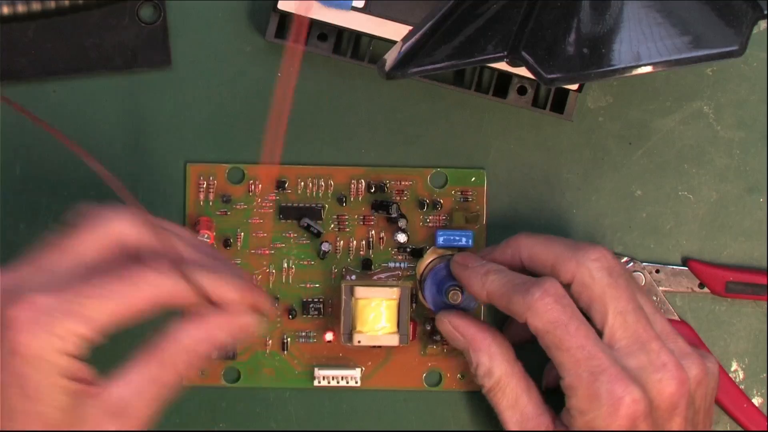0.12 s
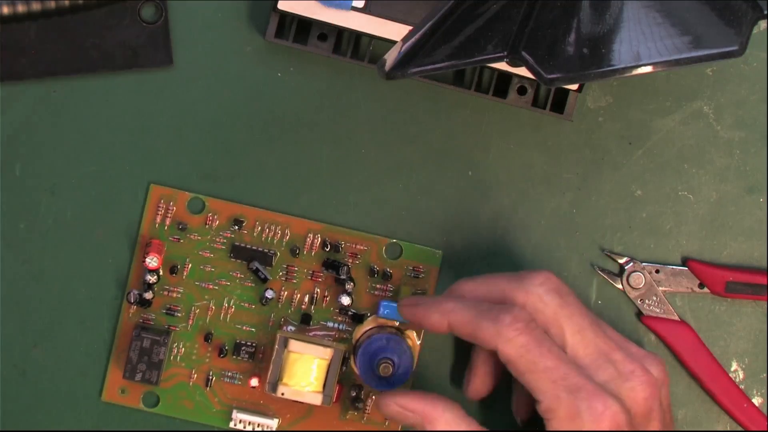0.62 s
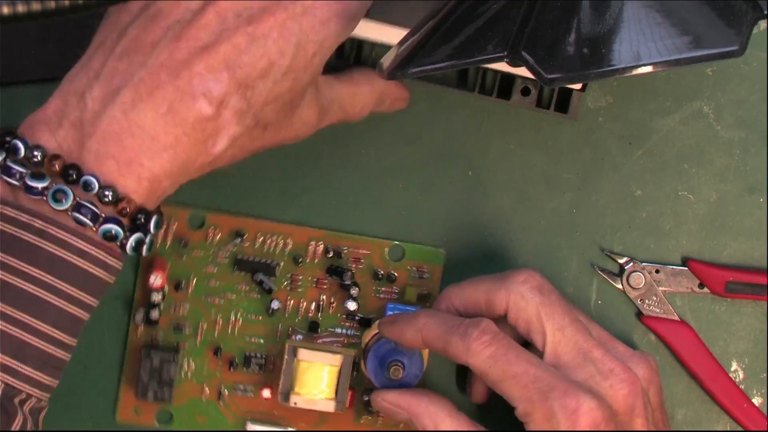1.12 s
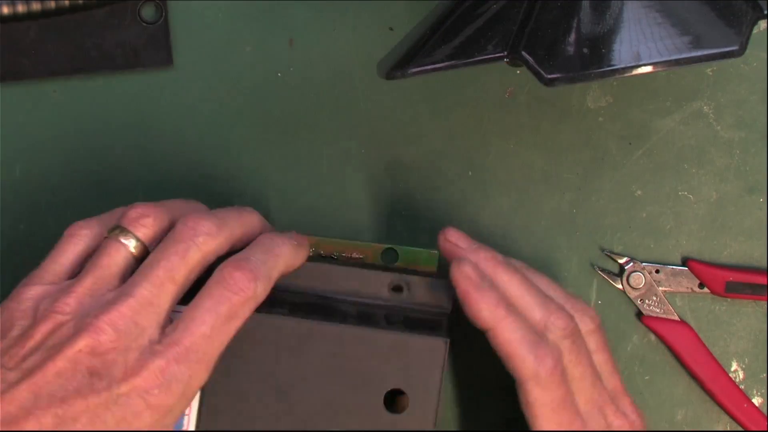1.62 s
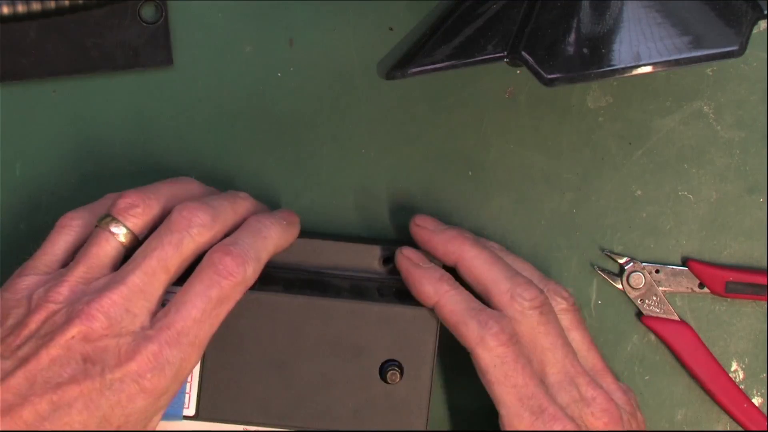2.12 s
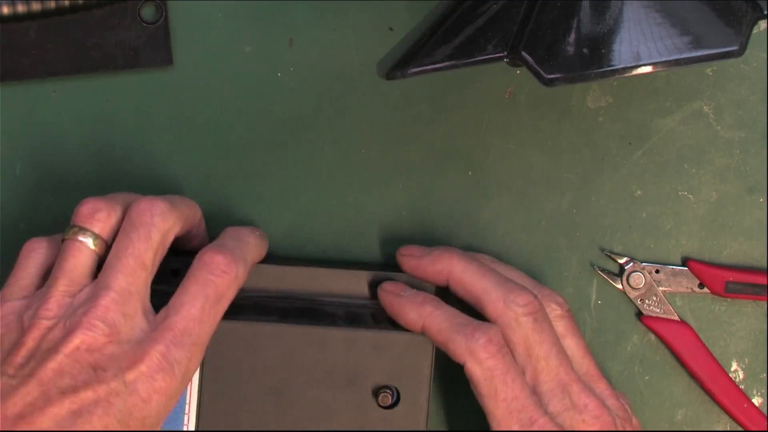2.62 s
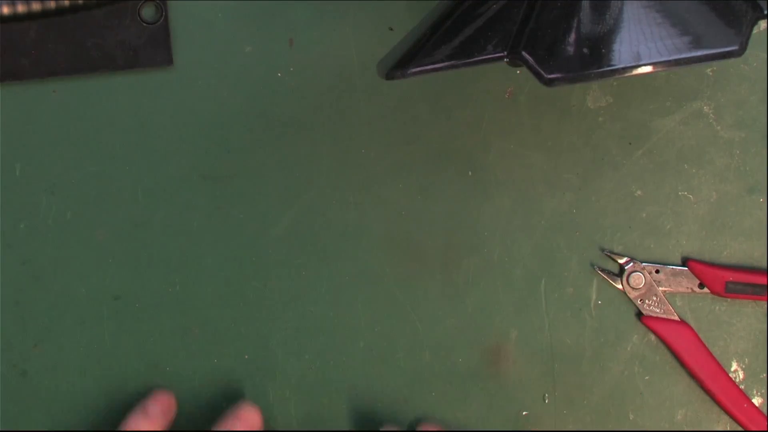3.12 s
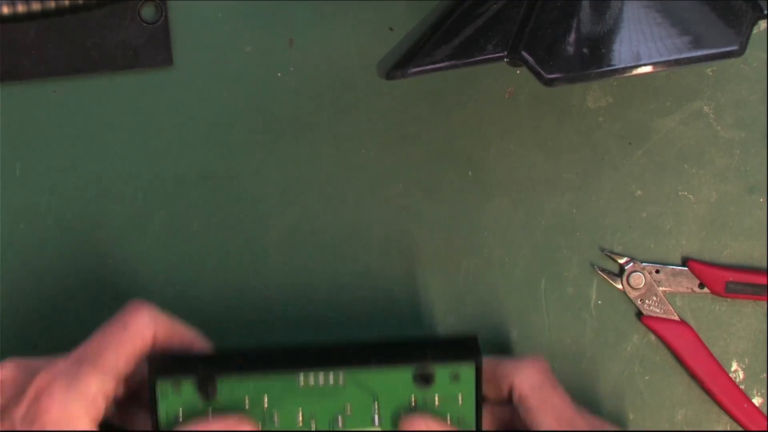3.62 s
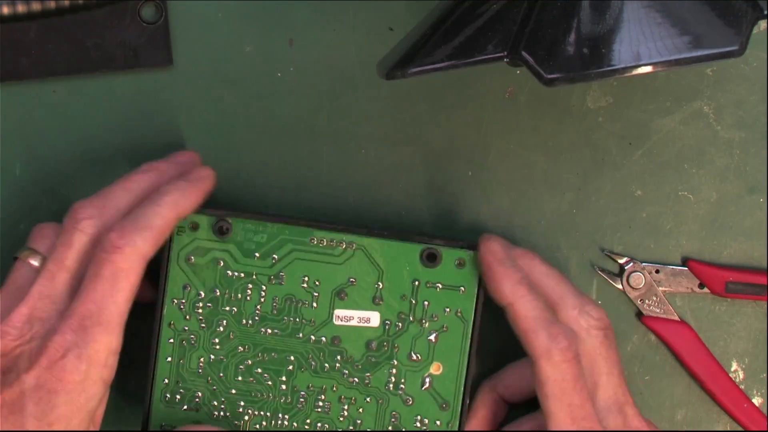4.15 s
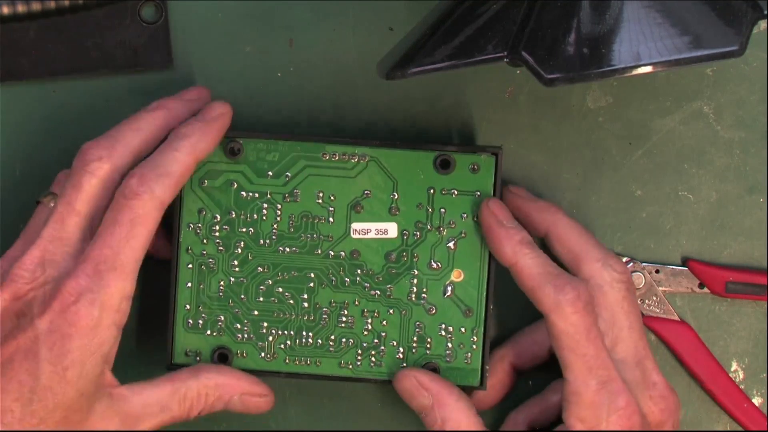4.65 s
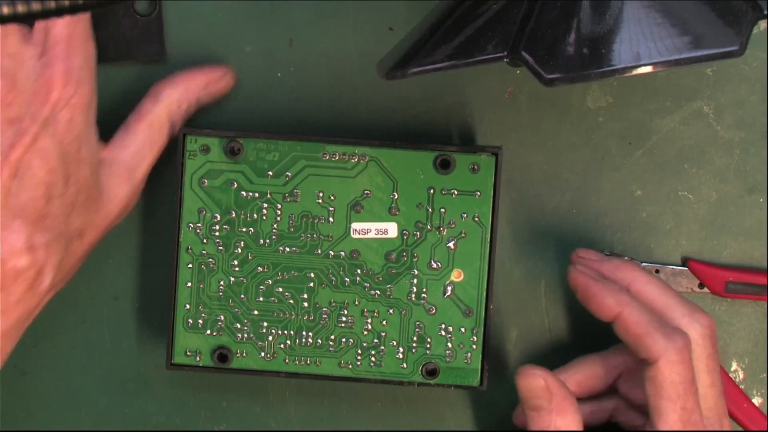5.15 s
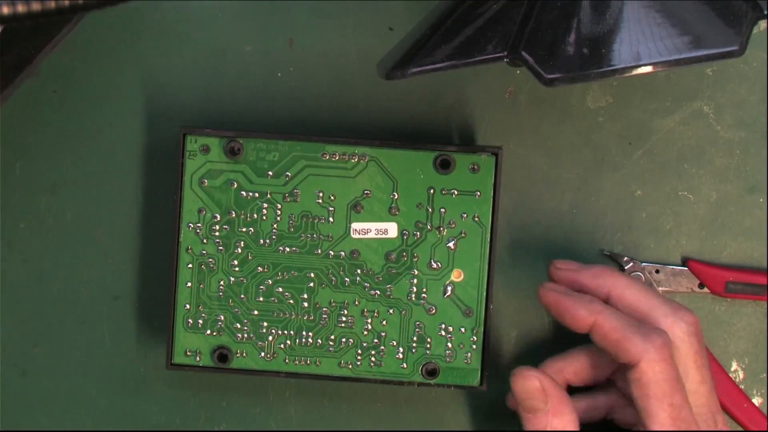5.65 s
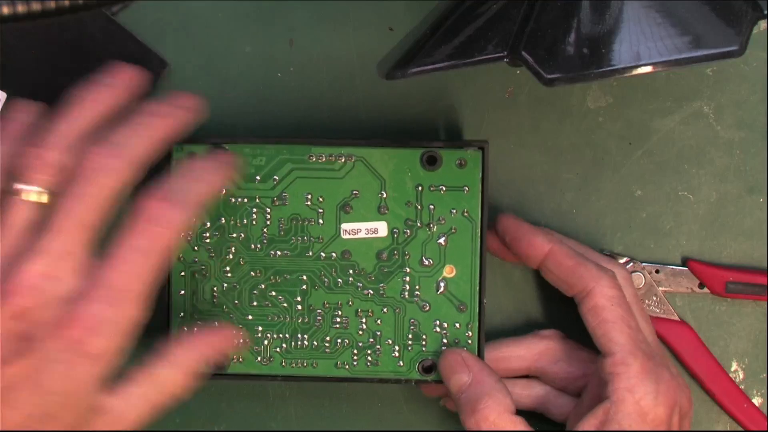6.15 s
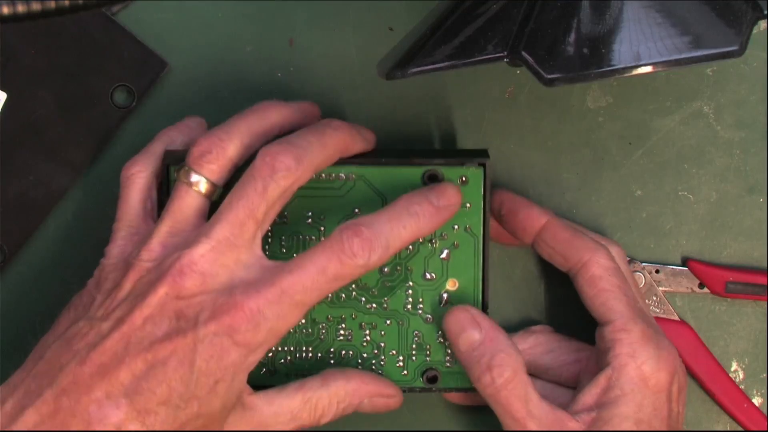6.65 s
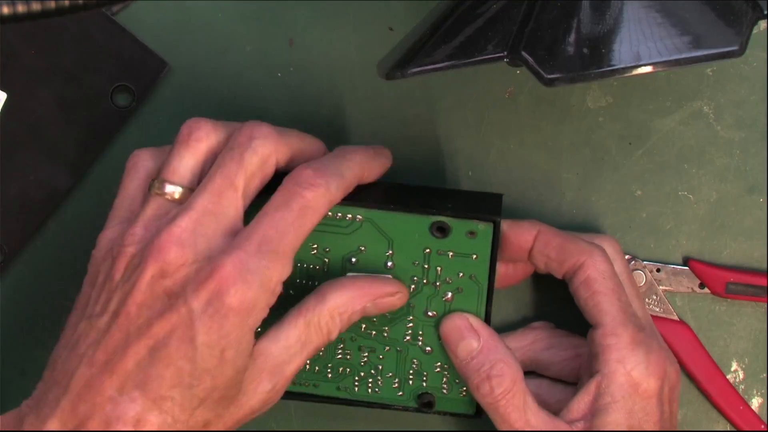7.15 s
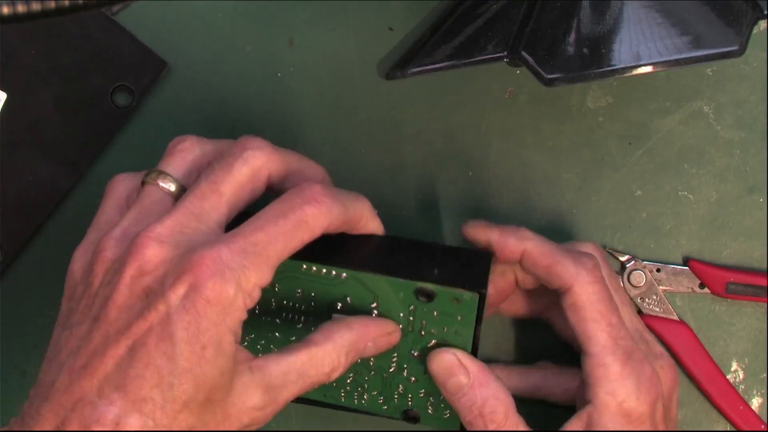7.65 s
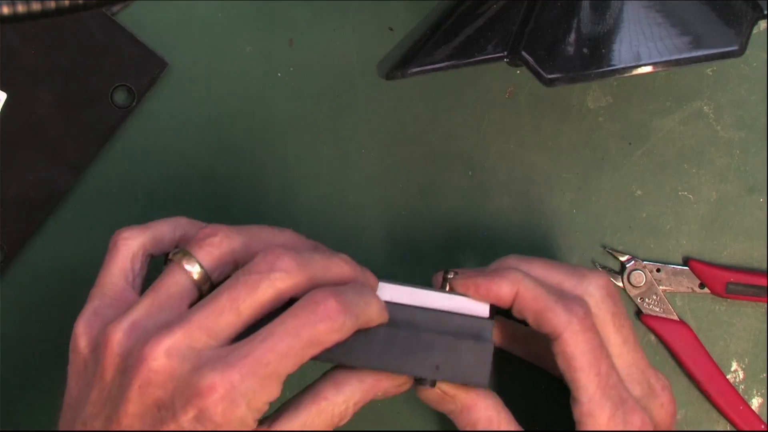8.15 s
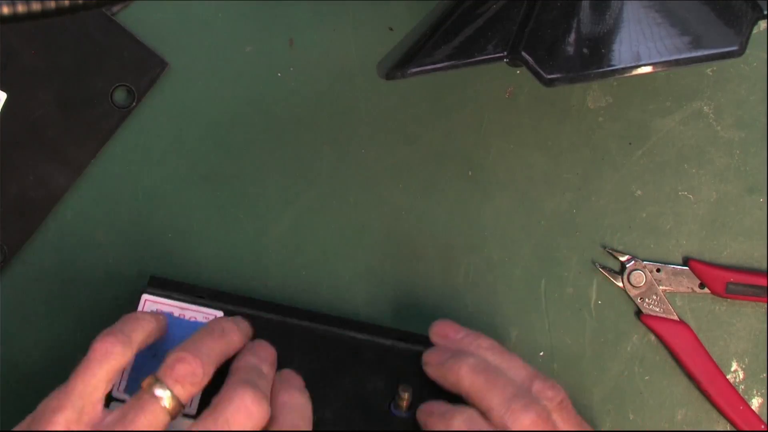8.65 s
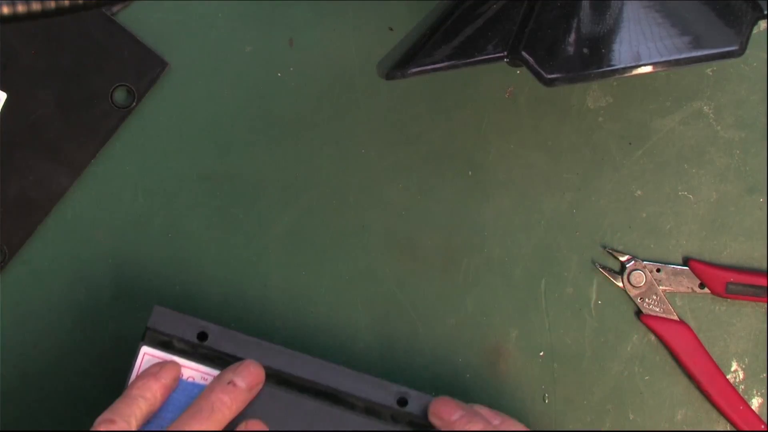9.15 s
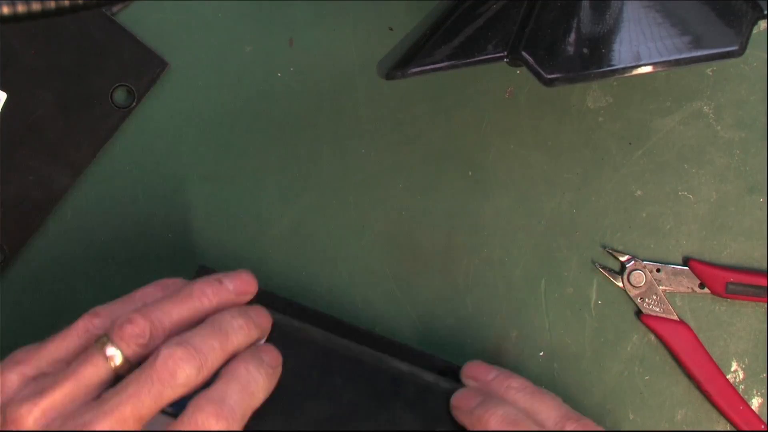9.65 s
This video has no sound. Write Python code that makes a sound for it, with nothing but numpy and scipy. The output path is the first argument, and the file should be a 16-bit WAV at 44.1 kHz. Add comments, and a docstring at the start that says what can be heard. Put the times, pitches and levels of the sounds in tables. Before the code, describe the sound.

A circuit board ticks lightly on a workbench, then a hollow plastic housing knocks, scrapes and clacks, with the hardest cracks near the end.

```python
"""Hands at a quiet workbench drag and tick a circuit board, as short decaying rings and gritty rubs.
A hollow plastic housing then knocks and scrapes, booming near 800 Hz with hard edges that crack; a plastic
lid taps briefly, and the housing returns with its hardest knocks near the end. Heavy knocks shake the bench.
Filtered noise gives rumble and hiss and sparse random taps a short room tail; the hardest knocks overload."""
import sys
import numpy as np
from scipy import signal
from scipy.fft import rfft, irfft
from scipy.io import wavfile
from scipy.ndimage import uniform_filter1d

SR = 44100
rng = np.random.default_rng(int(sys.argv[2]) if len(sys.argv) > 2 else 0)


def master_out(mix):
    """Clip the mix to full scale and print it as 16-bit PCM to the path in sys.argv[1]."""
    frames = np.transpose(np.atleast_2d(mix))
    ceiling = np.clip(frames, -1, 1)
    pcm = np.round(ceiling * 32767).astype(np.int16)
    wavfile.write(sys.argv[1], SR, pcm)


def ratio(d):
    """dB to gain"""
    e = np.asarray(d, float) / 20
    return 10 ** e


N = 431298  # samples
WALL_HZ = 1450  # modes from here up belong to the thin walls, those below to the hollow body

# Ringing modes of the plastic housing. Each row: frequency in Hz, level in dB, t60 in seconds.
HOUSING_MODES = [(517, -6, 0.029), (695, -9, 0.093), (770, 6.5, 0.029), (827.4, 6.5, 0.038),
                 (900, 11, 0.024), (1014, 2, 0.027), (1125, -0.5, 0.026), (1272, 0.5, 0.02),
                 (1390, -14, 0.016), (1530, 11, 0.041), (1700, 8, 0.035), (1900, 20, 0.0088),
                 (2320, 9.5, 0.034), (2700, 14, 0.022), (3370, 5, 0.014), (3520, 8, 0.018),
                 (4180, 16, 0.0076), (4480, 13, 0.0084), (5320, -4, 0.056), (5770, 6, 0.051)]
# Colour of the crowded small wall modes. Each row: frequency in Hz, level in dB.
CROWDED_COLOUR = [(700, -38), (1300, -2.5), (2500, -6.5), (4500, -6.5), (6500, -29)]


def evened(x):
    """Scales x to rms 1."""
    return x / np.sqrt(np.mean(x ** 2) + 1e-20)


def loudest(x):
    """Rms of the loudest 6 ms."""
    return np.sqrt(uniform_filter1d(x ** 2, size=265).max())


def read(points, hz):
    """Reads a two-column table along a log-frequency axis."""
    f, value = np.transpose(points)
    return np.interp(np.log(hz + 1), np.log(f + 1), value)


def coloured(x, points):
    """Filters x by the dB curve in points."""
    gain = ratio(read(points, np.fft.rfftfreq(len(x), 1 / SR)))
    return irfft(rfft(x) * gain, len(x))


def resonate(x, hz, width):
    """Shifts the curve hz down to zero, smooths, and shifts back: a resonance that can move."""
    turn = np.exp(2j * np.pi * np.cumsum(hz * np.ones(len(x))) / SR)
    r = np.exp(-np.pi * width / SR)
    return 2 * (turn * signal.lfilter([1 - r], [1, -r], x / turn)).real


def ring(modes, spot_db, rise):
    """Decaying sines; the spot that is struck sets how strongly each mode answers."""
    t = np.arange(6000)[:, None] / SR
    hz, db, t60 = np.transpose(modes)
    sines = ratio(db + spot_db - 60 * t / t60) * np.sin(2 * np.pi * hz * t)
    return sines.sum(1) * (1 - np.exp(-t[:, 0] / rise))


def body_and_walls(modes):
    """Splits an object's modes into those of its hollow body and those of its thin walls."""
    return [m for m in modes if m[0] < WALL_HZ], [m for m in modes if m[0] >= WALL_HZ]


def favour(modes, hz, db_per_octave):
    """The struck spot favours modes near its own pitch: dB lost with distance from hz."""
    return -db_per_octave * abs(np.log2(np.array(modes)[:, 0] / hz))


def air():
    """Filtered noise: drifting room rumble and microphone hiss, and a fuzzy low hum from a narrow resonance."""
    # Rumble and hiss colour. Each row: frequency in Hz, relative level in dB.
    air_colour = [(12, -47), (20, 11.5), (55, -6), (77, -1), (150, -2.5), (301, -3), (337, -5), (433, -5),
                  (678, -7), (1860, -13.5), (2390, -13.5), (2980, -14.5), (16000, -20.5)]
    # Low hum. Each row: frequency in Hz, rms level in dB.
    hum_tones = [(145.3, -61)]
    level_db, drift_db, hum_width_hz = -45.5, 0.5, 4.8
    drift = evened(uniform_filter1d(rng.standard_normal(N), size=9000))
    hum = sum(ratio(db) * evened(resonate(rng.standard_normal(N), hz, hum_width_hz)) for hz, db in hum_tones)
    noise = evened(coloured(rng.standard_normal(N), air_colour))
    return ratio(level_db + drift_db * drift) * noise + hum


def rubbing():
    """Uneven slips ring the hollow body; finer grit scratches through the walls and hisses off the surface."""
    # Fingers and edges dragging. Each row: start in seconds, length before the lift in seconds,
    # body rub level in dB, scratch level in dB, rubbed face pitch in Hz.
    strokes = [(0.0, 0.26, -58, -51, 3100), (0.452, 0.079, -51, -47, 1850), (.59, .1, -66, -56, 1800),
               (0.898, 0.079, -46.5, -51.5, 2700), (1.01, 0.068, -46.5, -49, 3500),
               (1.026, 0.082, -69, -49, 3100), (1.67, .07, -56, -64, 2800), (1.887, 0.1, -55, -48.5, 3040),
               (1.988, 0.052, -46.5, -63, 2100), (2.333, 0.043, -51, -62, 1900),
               (2.397, 0.046, -51, -48, 1800), (2.599, 0.35, -46, -55, 2440),
               (2.782, 0.099, -39, -43, 2320), (2.806, 0.23, -44.5, -45.5, 3500),
               (2.971, 0.084, -36, -42, 2700), (3.004, .04, -45, -47, 4800), (3.068, .2, -41.5, -44, 2250),
               (3.177, 0.02, -58, -48, 5830), (3.267, 0.14, -39.5, -53, 2420),
               (3.53, 0.28, -51.5, -55.5, 2500), (3.715, 0.073, -46.5, -74, 2040),
               (3.923, 0.037, -38, -45, 2300), (3.945, 0.014, -50, -50, 4300),
               (3.977, 0.033, -29.5, -47, 2100), (5.364, 0.079, -65, -50.5, 3350),
               (5.515, 0.2, -63, -57, 3100), (5.935, 0.077, -47, -43.5, 2850),
               (6.164, 0.031, -44.5, -54, 2500), (6.24, 0.035, -51, -53, 2500),
               (6.368, 0.054, -42.5, -50, 2400), (6.797, 0.16, -49.5, -59, 2000),
               (6.975, 0.053, -48, -55, 2000), (7.22, 0.5, -54, -73, 2500), (7.636, 0.16, -50.5, -66, 2700),
               (7.826, .12, -46.5, -64, 2700), (8.3, .08, -49, -57, 2400), (8.092, 0.13, -51, -71, 2200),
               (8.401, 0.065, -39, -49, 2720), (8.501, .08, -51, -61, 2400), (8.81, 0.11, -52, -63, 2840),
               (9.188, 0.024, -40, -31.5, 5500), (9.23, 0.046, -58, -66, 2500)]
    # Surface hiss colour. Each row: frequency in Hz, relative level in dB.
    hiss_colour = [(3000, -16), (4500, -3.5), (7000, 5), (11000, 1), (16000, -3)]
    slips_per_s, grit_per_s, size_db, catch_db = 700, 3000, 1.5, 1.6
    touch_s, lift_s, ease_db = 0.0057, 0.059, -4.0  # strokes press on, ease off along their length and lift
    hiss_db = -5.5  # relative to the scratch level

    draw, sign = rng.random(N), rng.choice([-1., 1.], N)
    catches = evened(uniform_filter1d(rng.standard_normal(N), size=500))  # the surface grips and lets go
    sizes = ratio(size_db * np.minimum(rng.exponential(1, N), 3) + catch_db * catches)
    slips = evened(sign * sizes * (draw < slips_per_s / SR))
    grit = evened(sign * sizes * (draw < grit_per_s / SR))

    body_modes, wall_modes = body_and_walls(HOUSING_MODES)
    body = ring(body_modes, 0, 0.0009)
    walls = ring(wall_modes, 0, 0.0015)
    chirr = evened(signal.oaconvolve(grit, walls)[:N])
    broad = 0.26 * chirr + 0.92 * evened(coloured(grit, CROWDED_COLOUR))
    hiss = evened(coloured(grit, hiss_colour))
    # the contact travels over the face, so its pitch wanders
    wander = 1 + 0.011 * evened(uniform_filter1d(rng.standard_normal(N), size=2000))

    push, scratches = np.zeros(N), np.zeros(N)
    for start, length, body_db, scratch_db, face_hz in strokes:
        t = np.arange(0, length + lift_s, 1 / SR)
        first = round(start * SR)
        part = slice(first, first + len(t))
        press = np.minimum(t / touch_s, 1) * np.minimum((t[-1] - t) / lift_s, 1)
        press *= ratio(ease_db * t / length)
        # Hz: a hard edge rings the face clearly, a light finger damps it
        width = 140 * ratio(0.73 * max(-39 - scratch_db, 0))
        focus = evened(resonate(broad[part], face_hz * wander[part], width))
        scratch = evened(broad[part] + 1.4 * focus) + ratio(hiss_db) * hiss[part]
        push[part] += ratio(body_db) * press
        scratches[part] += ratio(scratch_db) * press * scratch
    return scratches + signal.oaconvolve(slips * push, body / np.linalg.norm(body))[:N]


def room(x):
    """Sparse taps of random sign, each band dying at its own speed."""
    # Room decay. Each row: frequency in Hz, t60 in seconds.
    decay = [(150, 0.22), (800, 0.15), (3000, 0.13), (12000, 0.14)]
    taps = np.zeros(SR // 2)
    at = np.arange(150, len(taps) - 20, 20)
    taps[at + rng.integers(0, 20, len(at))] = rng.choice([-1., 1.], len(at))
    hz, t, z = signal.stft(taps, SR, nperseg=256)
    fade = ratio(-60 * t / read(decay, hz)[:, None])
    tail = signal.istft(z * fade, SR, nperseg=256)[1]
    return signal.fftconvolve(x, tail / np.linalg.norm(tail))[:N]


def blows(rows, modes, chatter_s, crowded_t60):
    """Each blow is one contact and a fading chatter of small bounces that ring the body and the walls."""
    # Crack colour. Each row: frequency in Hz, relative level in dB.
    crack_colour = [(2500, 0), (5000, 2), (9000, 0.5), (13000, -3), (16000, -8)]
    bounces_per_s, bounce_size, spot_spread_db, crack_t60 = 900, 0.52, 2.0, 0.013
    # crack over wall ring in dB at WALL_HZ; a harder edge rings a higher face and cracks louder
    crack_over_wall_db, crack_db_per_octave = -15, 8
    # dB of extra crack for each dB that the walls ring above a firm knock
    crack_growth, firm_db = 0.11, -28

    out, t = np.zeros(N + 9000), np.arange(6000) / SR
    body_modes, wall_modes = body_and_walls(modes)
    for s, body_db, body_hz, wall_db, bright_hz in rows:
        spots = spot_spread_db * rng.standard_normal(40)
        hit, size = rng.random(3000), rng.standard_normal(3000)
        grit, grain = rng.standard_normal((2, 6000))

        force = bounce_size * size * (hit < bounces_per_s / SR) * np.exp(-t[:3000] / chatter_s)
        force[0] = 1  # the first contact

        wall_spots = favour(wall_modes, bright_hz, 19) + spots[::-1][:len(wall_modes)]
        clear = ring(wall_modes, wall_spots, 0.000085)
        hollow = ring(body_modes, spots[:len(body_modes)] + favour(body_modes, body_hz, 19), 0.00097)
        face = [(bright_hz / 2, -9), (bright_hz, 0), (bright_hz * 2, -11)]
        crowded = coloured(coloured(grain, CROWDED_COLOUR), face) * ratio(-60 * t / crowded_t60)
        # crowded modes sit a little under the clear ones
        wall_ring = clear / loudest(clear) + 0.64 * crowded / loudest(crowded)
        crack = coloured(grit, crack_colour) * ratio(-60 * t / crack_t60) * (1 - np.exp(-t / 0.0004))

        boom, wall, snap = (signal.fftconvolve(force, r) for r in (hollow, wall_ring, crack))
        crack_db = wall_db + crack_over_wall_db + crack_db_per_octave * np.log2(bright_hz / WALL_HZ)
        crack_db += crack_growth * (wall_db - firm_db)
        sound = ratio(body_db) * boom / abs(boom).max()
        sound += ratio(wall_db) * wall / loudest(wall)
        sound += ratio(crack_db) * snap / loudest(snap)
        out[round(s * SR):][:len(sound)] += sound
    return out[:N]


def board_ticks():
    """The circuit board ticks: short stiff modes under a long chatter of bounces."""
    # Each row: start in seconds, body ring peak in dB, struck spot as body pitch in Hz,
    # wall ring level in dB, struck face as wall pitch in Hz.
    ticks = [(0.013, -50, 900, -45, 1850), (0.082, -60, 762, -42, 2380), (0.098, -58, 1300, -45, 1800),
             (0.109, -60, 770, -36.5, 3200), (0.358, -27.5, 1200, -37.5, 2700),
             (0.393, -49, 1190, -44, 2870), (0.409, -36, 1090, -34.5, 1860), (0.44, -35, 824, -28, 3700),
             (0.533, -43, 606, -43, 3460), (0.585, -52, 877, -35.5, 1770), (0.634, -35, 883, -37, 2880),
             (0.681, -42, 859, -45, 1660)]
    # Board modes. Each row: frequency in Hz, level in dB, t60 in seconds.
    board_modes = [(900, 0, 0.018), (1200, 16, 0.0099), (1800, -3, 0.072), (2100, -13, 0.035),
                   (2700, 4, 0.027), (3200, 16, 0.012), (3670, 5, 0.035), (4470, -10, .03)]
    return blows(ticks, board_modes, chatter_s=0.011, crowded_t60=0.026)


def thumps():
    """The bench top answers heavy knocks with slow low modes."""
    # Knocks that shake the bench. Each row: start in seconds, peak in dB, strongest ring in Hz.
    heavy_knocks = [(0.438, -33, 148), (0.482, -31.5, 385), (1.629, -35, 135), (1.958, -28, 127),
                    (2.386, -22, 377), (2.777, -26.5, 385), (3.289, -35, 323), (3.392, -39, 248),
                    (3.701, -18.5, 272), (3.82, -31, 358), (3.884, -29, 371), (3.977, -31, 398),
                    (5.88, -41, 366), (5.922, -25, 398), (7.152, -31, 304), (8.051, -17.5, 266),
                    (8.194, -28, 132), (9.178, -12, 382), (9.77, -9.5, 275)]
    # Bench modes. Each row: frequency in Hz, level in dB, t60 in seconds.
    bench_modes = [(133.6, -6, 0.12), (200, -1, 0.065), (272.7, 6, 0.053), (353, 4, 0.055)]
    out = np.zeros(N + 6000)
    for s, db, hz in heavy_knocks:
        thud = ring(bench_modes, favour(bench_modes, hz, 10.5), 0.0012)
        out[round(s * SR):][:len(thud)] += ratio(db) * thud / abs(thud).max()
    return out[:N]


def housing_knocks():
    """The hollow housing knocks: its body booms, its thin walls ring and its hard edges crack."""
    # Each row: start in seconds, body ring peak in dB, struck spot as body pitch in Hz,
    # wall ring level in dB, struck face as wall pitch in Hz.
    knocks = [ (1.632, -19.5, 1390, -24, 3430), (1.637, -30, 800, -41, 4740),
              (1.647, -31, 1050, -34.5, 2970), (1.748, -35.5, 795, -53, 3250),
              (1.892, -43, 1100, -47, 3000), (1.903, -19.5, 1220, -57, 1500), (1.92, -35, 1400, -52, 1530),
              (1.955, -22, 790, -31.5, 1490), (1.976, -13.5, 850, -29.5, 1460),
              (2.055, -31.5, 921, -57, 2440), (2.374, -23, 850, -38, 1700), (2.389, -2, 766, -20.5, 1520),
              (2.399, -9, 825, -49, 1600), (2.48, -31.5, 800, -57, 2320), (2.584, -29, 910, -57, 1650),
              (2.685, -41, 850, -47, 6000), (2.757, -24, 850, -42, 1900), (2.767, -20, 850, -34.5, 1900),
              (2.776, -4.5, 725, -29.5, 2200), (2.894, -22, 796, -51, 3520), (2.955, -5, 830, -24, 1830),
              (3.046, -23, 902, -52, 2690), (3.073, -25, 845, -48, 2300), (3.086, -32, 850, -50, 2000),
              (3.091, -14.5, 824, -37, 2270), (3.106, -24, 840, -43, 2000), (3.14, -21, 800, -39, 2300),
              (3.151, -29, 924, -31, 2100), (3.289, -30, 860, -42, 2860), (3.393, -23.5, 770, -44, 1520),
              (3.699, -12, 900, -34, 2800), (3.703, -4, 930, -22, 1480), (3.711, -9, 900, -28, 1620),
              (3.822, -0.5, 830, -24.5, 1580), (3.8255, -15, 920, -28, 4170), (3.833, -14, 900, -29, 2300),
              (3.845, -11.5, 840, -35, 1500), (3.886, -1, 820, -22.5, 1530), (3.903, -10, 900, -30, 3650),
              (3.936, -18, 907, -35, 1500), (3.942, -14, 970, -55, 2600), (3.974, -4, 850, -26, 1490),
              (3.995, -27, 789, -39.5, 3690), (4.008, -20, 783, -44, 2840), (4.021, -22, 720, -47, 2040),
              (4.412, -11.5, 880, -37.5, 1950), (6.263, -35, 875, -52, 2600), (6.293, -34, 860, -49, 2260),
              (6.316, -30.5, 820, -46, 2680), (6.404, -31, 825, -46, 2430), (6.878, -33, 710, -43, 1570),
              (6.911, -33, 805, -47, 2000), (6.93, -33, 844, -48, 1700), (6.938, -18, 910, -30, 1500),
              (7.102, -29, 900, -38, 1520), (7.152, -30, 810, -34, 1520), (7.155, -11.5, 780, -28, 1900),
              (7.343, -29, 774, -54, 2000), (7.55, -33, 826, -54, 4100), (7.651, -24.5, 880, -48, 1550),
              (7.716, -25, 665, -51, 1500), (8.044, -17.5, 695, -41, 2300), (8.048, -31, 850, -47, 2300),
              (8.051, -4.5, 820, -15, 2690), (8.053, -0.5, 840, -17, 2210), (8.062, -35, 780, -47, 2700),
              (8.074, -38, 818, -37, 2330), (8.196, -17.5, 770, -34, 2550), (8.301, -27.5, 900, -52, 2390),
              (8.513, -43, 727, -60, 1840), (9.177, -10, 704, -14.5, 2700), (9.181, 2.5, 755, -6.5, 2720),
              (9.188, -2.5, 890, -9.5, 4130), (9.195, -25, 900, -26, 5500), (9.199, -22, 810, -19, 1530),
              (9.207, -16, 900, -30, 2700), (9.216, -23, 696, -34, 1700), (9.226, -36, 900, -32, 1700),
              (9.464, -21.5, 670, -46, 1700), (9.763, -15, 800, -38, 3000), (9.7675, -27, 765, -17, 2260),
              (9.77, -16.5, 452, -13.5, 4470), (9.774, 4, 750, -12.5, 3820)]
    return blows(knocks, HOUSING_MODES, chatter_s=0.0055, crowded_t60=0.027)


def lid_taps():
    """The plastic lid shifts and taps, ringing its own set of modes."""
    # Each row: start in seconds, body ring peak in dB, struck spot as body pitch in Hz,
    # wall ring level in dB, struck face as wall pitch in Hz.
    taps = [(5.399, -45, 514, -44, 1590), (5.425, -37.5, 950, -52, 2000), (5.504, -41, 1080, -42.5, 2450),
            (5.552, -53, 603, -43.5, 4400), (5.584, -42, 595, -34.5, 3040), (5.633, -38, 720, -29, 3700),
            (5.781, -38, 800, -50, 2050), (5.875, -38, 600, -47, 2500), (5.88, -27, 600, -32, 3160),
            (5.921, -13.5, 950, -13.5, 2610), (5.925, -16, 1110, -14.5, 3000),
            (5.932, -16.5, 580, -25, 1800), (5.939, -27, 681, -25, 1760), (5.951, -41, 600, -30, 1800),
            (5.971, -20.5, 710, -27, 2800), (5.982, -24.5, 600, -33, 2760), (5.999, -28, 1310, -34, 1800),
            (6.021, -39, 813, -50, 1750)]
    # Lid modes. Each row: frequency in Hz, level in dB, t60 in seconds.
    lid_modes = [(502, -0.5, 0.022), (653, 8, 0.0087), (1100, 20.5, 0.0088), (1260, 10, 0.019),
                 (1740, 15, 0.029), (1945, 5, 0.044), (2450, -15, 0.027), (2700, 4, 0.01),
                 (3000, 16, 0.0063), (3830, -19, 0.037), (4260, -19, 0.023), (4840, 16.5, 0.015)]
    return blows(taps, lid_modes, chatter_s=0.008, crowded_t60=0.026)


def scene():
    """All handling sounds, their room tail and the background."""
    hands = rubbing() + board_ticks() + thumps() + housing_knocks() + lid_taps()
    room_db = -17.0
    return (hands + ratio(room_db) * room(hands) + air())[None]


def top_cut(x):
    """Nothing passes above the cut-off."""
    return signal.sosfilt(signal.butter(12, 16130, fs=SR, output="sos"), x)


def record(dry):
    """The hardest knocks clip at full scale; the input stage blocks the deepest bass."""
    clipped = np.clip(dry, -1, 1)
    bass_block = signal.butter(3, 65, "high", fs=SR, output="sos")
    blocked = signal.sosfilt(bass_block, clipped)
    finished = np.clip(blocked, -1, 1)
    return top_cut(finished)


dry = scene()
out = record(dry)
master_out(out)
```